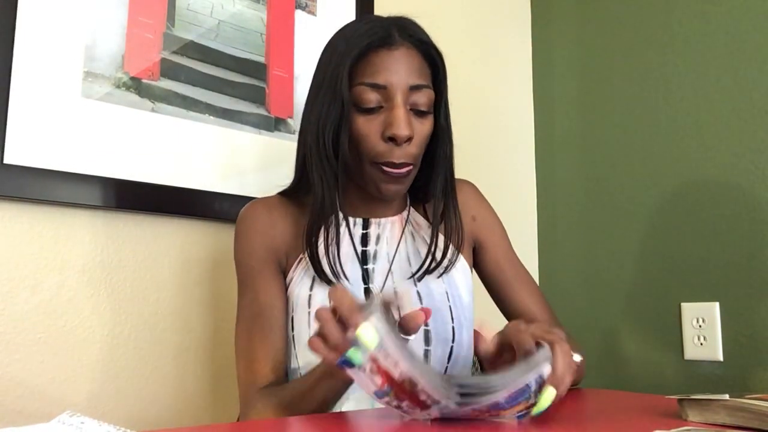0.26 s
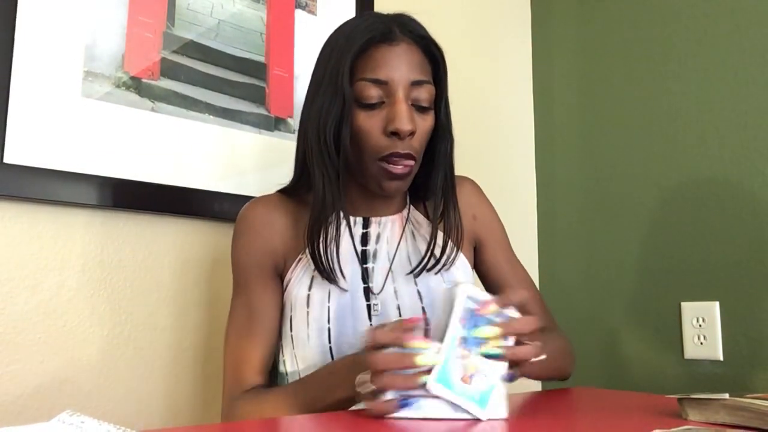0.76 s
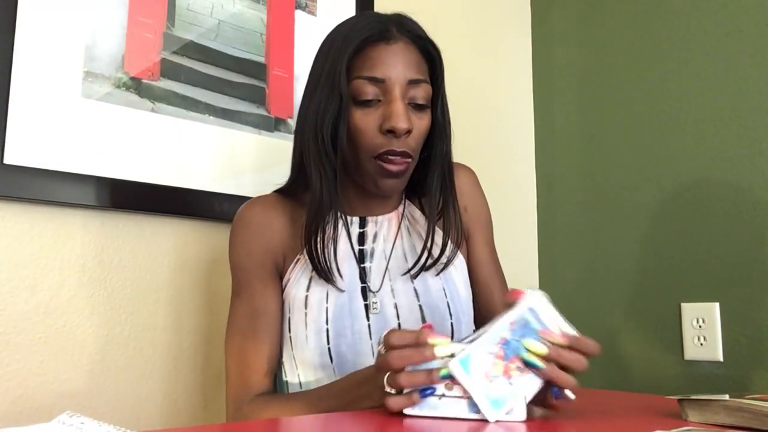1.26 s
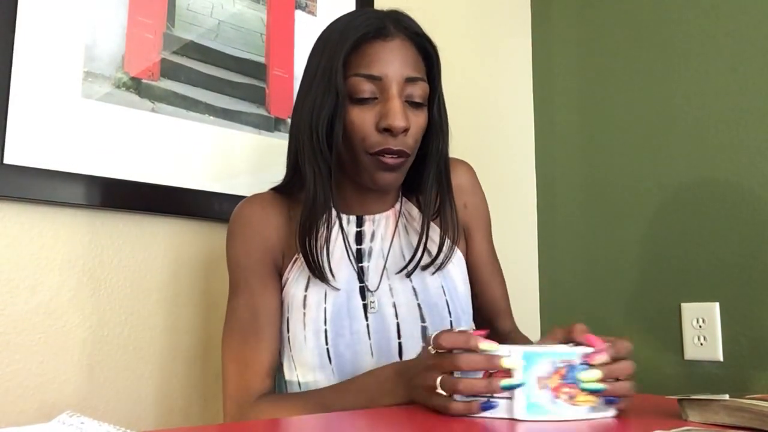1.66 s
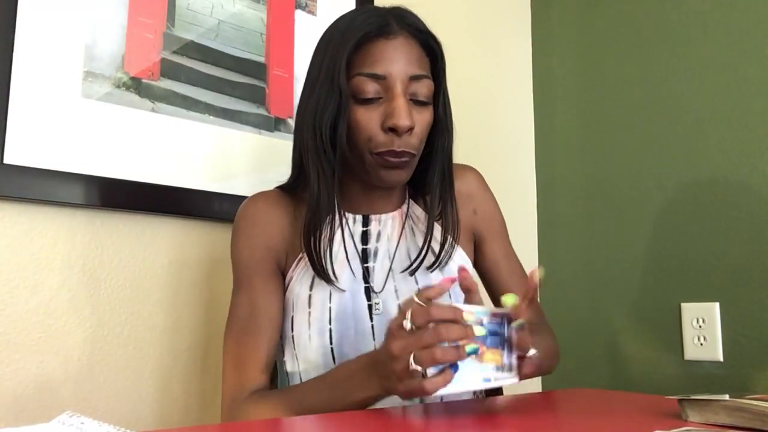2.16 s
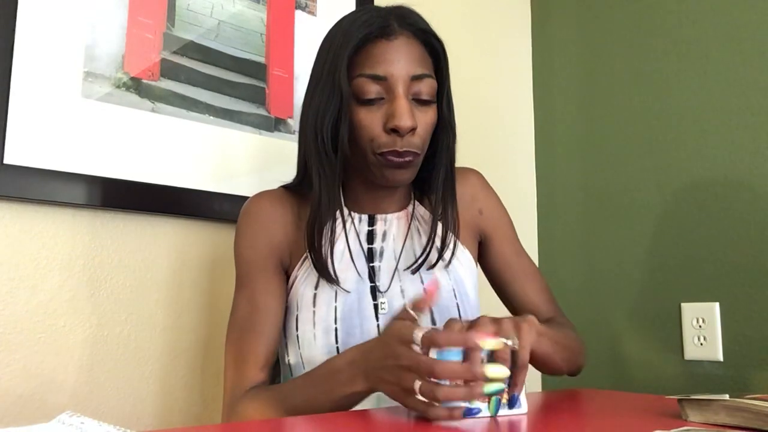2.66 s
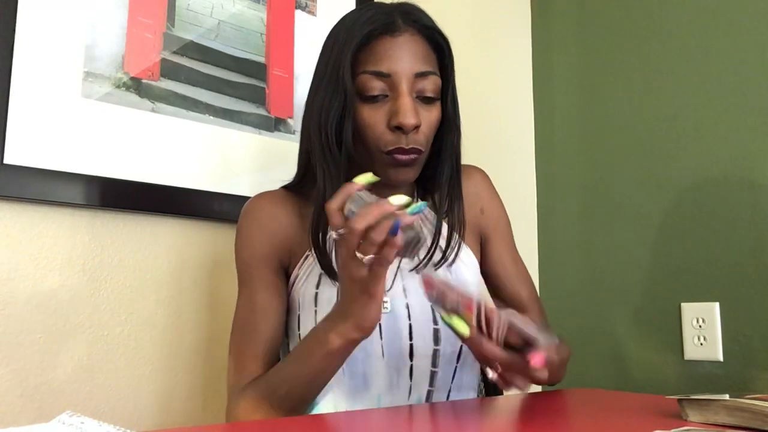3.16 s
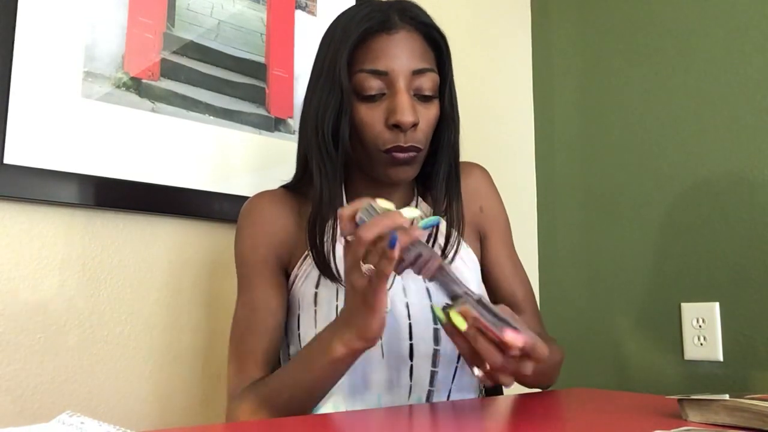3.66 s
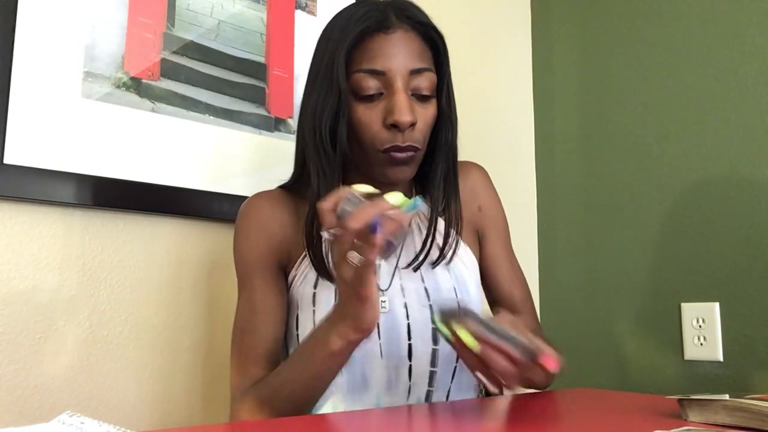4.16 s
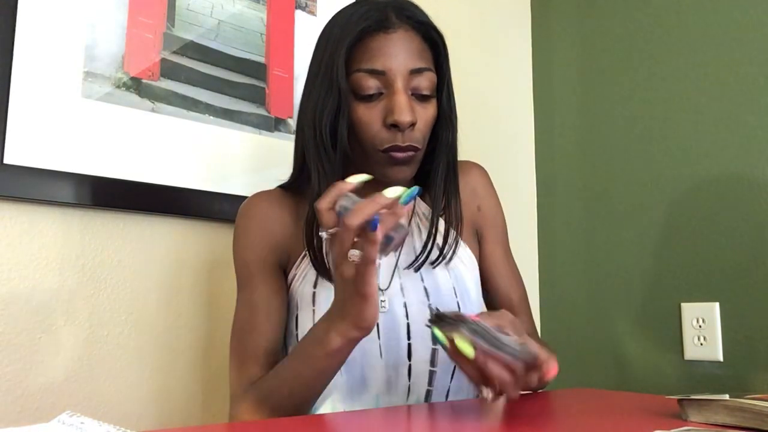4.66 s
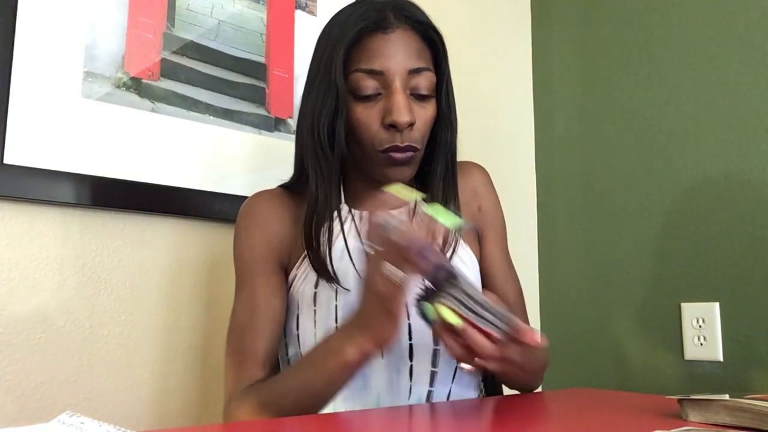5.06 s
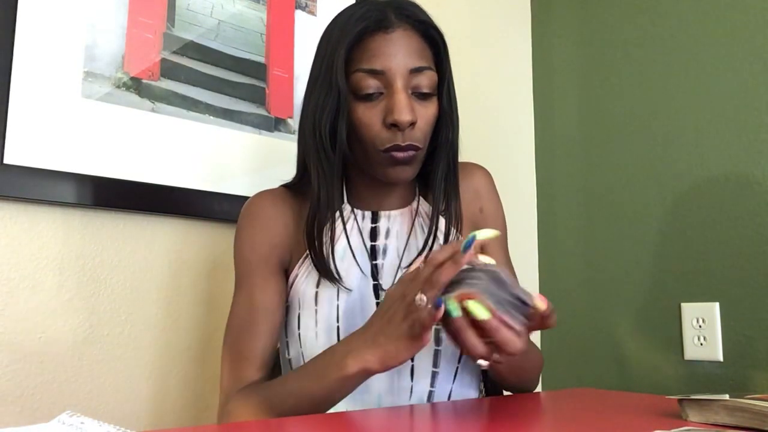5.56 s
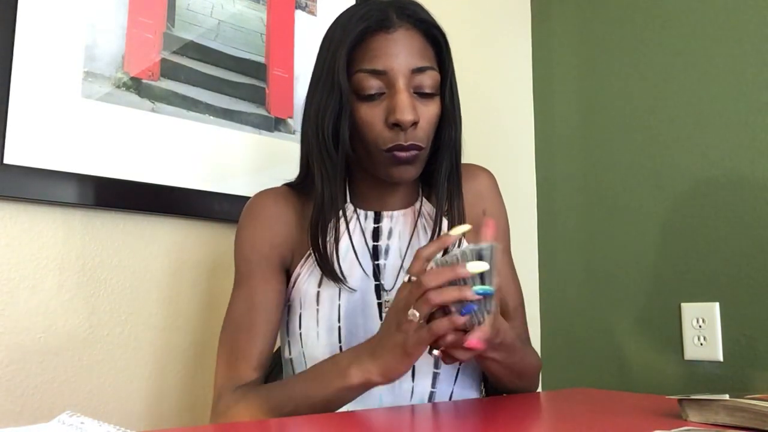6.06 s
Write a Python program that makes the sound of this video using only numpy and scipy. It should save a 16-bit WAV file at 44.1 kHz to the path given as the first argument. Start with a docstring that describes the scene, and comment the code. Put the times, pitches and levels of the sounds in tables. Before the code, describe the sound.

Quick crackling card riffle, light table thuds and taps, one crisp double slap, then faint papery overhand shuffling above a low ventilation hum.

```python
"""A deck of cards is riffled on a table, squared with knocks and taps, then shuffled overhand in a quiet room.
Each card edge is a short burst of noise around its own pitch, topped by a bright crack.
Pushes from the deck set the modes of the table top ringing, and packets slide over each other as grainy noise.
The room adds a tail of dying noise; below it all ventilation hums as steady coloured noise."""
import sys
import numpy as np
from scipy import signal
from scipy.fft import rfft, irfft, next_fast_len
from scipy.io import wavfile

SR = 44100
rng = np.random.default_rng(int(sys.argv[2]) if len(sys.argv) > 2 else 0)


def store_pcm(level_fs):
    """Save levels as 16-bit WAV."""
    pcm = np.round(np.clip(level_fs, -1, 1) * 32767).astype(np.int16)
    wavfile.write(sys.argv[1], SR, np.atleast_2d(pcm).T)


def invert_db(x):
    """Field ratio 10**(x/20) for x, a level in decibels (scalar or array-like)."""
    u = np.asarray(x, float) / 20
    return 10 ** u


N = 277830   # length in samples

# card corners that snap loudest in the riffle: t/s, slap peak level/dB, slap f/Hz, crack peak level/dB
LOUD_CORNERS = [(0.164, -21.5, 1200, -21), (0.1945, -15, 1310, -13.5), (0.2051, -16, 1460, -21),
                (0.2163, -9, 2200, -12.5), (0.2275, -11, 3880, -14), (0.2437, -8.5, 1100, -24),
                (0.254, -11, 1040, -28), (0.2703, -5.5, 1880, -12.5), (0.2874, -7.5, 1370, -25),
                (0.3226, -10.5, 2560, -18), (0.3292, -6.5, 2200, -27), (0.3383, -3.5, 2390, -14),
                (0.3473, -8.5, 1880, -9.5)]
# short ticks of edges and nails: t/s, slap peak level/dB, slap f/Hz, crack peak level/dB
EDGE_TICKS = [(0.0676, -40, 720, -48), (0.6461, -40.5, 1250, -34.5), (0.7128, -38, 758, -41.5),
              (0.8563, -35.5, 3750, -66), (0.8705, -28.5, 3940, -30.5), (0.9531, -41, 2860, -45.5),
              (0.9658, -36, 3086, -44.5), (1.0784, -36, 3220, -46), (1.106, -46, 1450, -53),
              (1.1628, -40.5, 3660, -50), (1.195, -38, 2650, -48), (1.312, -38.5, 1710, -36.5),
              (1.4731, -45, 3720, -68), (1.6977, -38, 2640, -37), (1.7516, -21.5, 3320, -38),
              (1.7583, -24, 3300, -32.5), (1.854, -41, 3900, -46), (2.0557, -42.5, 1670, -53),
              (2.0904, -35, 2740, -45), (2.133, -36, 1230, -42.5), (2.3059, -50.5, 2000, -58.5),
              (2.4501, -54, 1300, -35), (2.6256, -29.5, 2380, -30), (2.7604, -32.5, 1500, -42),
              (3.213, -31, 2610, -44), (3.242, -47, 1408, -50), (3.3979, -45, 1760, -56),
              (3.4548, -42, 2840, -58), (3.5056, -43, 750, -48.5), (3.661, -47.5, 760, -41.5),
              (3.602, -56, 2970, -54), (3.7, -49, 1400, -60), (3.7261, -42.5, 1390, -54),
              (4.0001, -39.5, 739, -42), (4.3972, -38.5, 1174, -51), (4.4713, -44, 2590, -43),
              (4.5152, -43, 740, -42), (5.4538, -37, 1870, -41), (5.4571, -31.5, 756, -40),
              (5.464, -31, 4110, -54), (5.629, -52.5, 887, -48.5)]
# packets landing, mostly dull and longer than the ticks, plus one faint high rattle near 5.47 s:
# t/s, slap peak level/dB, slap f/Hz, contact t60/s (used up to 0.2)
PACKET_SLAPS = [(0.697, -26.5, 1040, 0.069), (0.8335, -30.5, 1273, 0.041), (1.3621, -33, 750, 0.035),
                (2.1204, -32, 1160, 0.037), (2.1862, -30.5, 1190, 0.044), (2.3726, -19, 1900, 0.036),
                (2.3832, -8, 1350, 0.032), (2.3906, -5.5, 1810, .041), (2.3973, -17, 1350, 0.023),
                (2.5273, -26, 1680, 0.049), (2.5489, -21, 1820, .01), (2.5562, -15.5, 1820, 0.025),
                (2.6415, -40, 1385, 0.01), (4.2548, -32, 770, 0.027), (4.658, -28, 1855, 0.01),
                (4.7314, -37, 755, 0.018), (3.222, -36.5, 1500, 0.038), (5.231, -36.5, 786, 0.047),
                (5.2388, -36, 776, 0.026), (5.467, -44, 4800, 0.23)]
# the deck pushing on the table top: t/s, push level/dB
DECK_PUSHES = [(0.689, -23.5), (0.714, -29), (0.858, -37), (0.904, -41.5), (1.253, -47.5), (1.362, -30.5),
               (1.737, -40.5), (1.801, -41.5), (2.093, -41.5), (2.123, -36.5), (2.187, -41.5),
               (2.376, -32.5), (2.3885, -23), (2.533, -33), (2.558, -26.5), (2.761, -37)]
# ringing modes of the table top: f/Hz, level/dB relative to the push, t60/s
TABLE_MODES = [(114, -10, 0.095), (161.2, -3.5, 0.13), (269.6, -0.5, 0.042), (367, -9, 0.054),
               (634.7, -14, 0.08)]
# strokes of cards over cards: start t/s, length t/s, rub level/dB, treble hiss level/dB
CARD_STROKES = [(0.064, 0.013, -63, -79), (0.129, 0.011, -57.5, -90), (0.187, .19, -30.5, -40),
                (0.645, 0.046, -62.5, -64), (0.673, 0.096, -63, -79), (0.825, 0.11, -58.5, -74.5),
                (1.094, 0.023, -72, -93), (1.18, 0.15, -67.5, -83), (1.275, 0.087, -63, -71),
                (1.457, 0.18, -68, -79), (1.66, 0.056, -59, -74), (1.741, 0.054, -55, -62),
                (1.881, 0.097, -65.5, -65.5), (2.075, 0.11, -55, -71), (2.288, 0.017, -75, -99),
                (2.375, 0.047, -38.5, -59), (2.536, .1, -52.5, -94), (2.752, 0.052, -59, -73.5),
                (3.021, 0.17, -71.5, -78.5), (3.196, 0.027, -48.5, -62), (3.358, .05, -62.5, -74.5),
                (3.422, 0.11, -58, -71), (3.621, 0.036, -58.5, -82), (3.649, 0.082, -55, -65.5),
                (3.866, 0.056, -64, -71), (3.979, 0.02, -53, -67), (4.186, 0.094, -55, -72),
                (4.398, 0.015, -52.5, -77), (4.455, 0.079, -56, -69), (4.648, 0.082, -52, -63),
                (4.89, 0.041, -66, -73), (4.929, 0.062, -54, -72), (5.123, 0.077, -58, -66.5),
                (5.219, 0.02, -54, -77), (5.368, 0.06, -58.5, -65.5), (5.446, 0.034, -56.5, -69),
                (5.625, 0.033, -55.5, -64.5), (5.802, 0.066, -70.5, -72.5), (6.082, 0.09, -76, -77.5)]
# colour of the rub while the deck is still on the table: f/Hz, relative level/dB per Hz
TABLE_RUB_COLOUR = [(200, -10.5), (700, -3), (2000, -5), (3600, -6), (4800, -16), (9000, -33.5)]
# colour of the rub with the deck in the hands: f/Hz, relative level/dB per Hz
HAND_RUB_COLOUR = [(200, 0.5), (450, -2), (1300, -8), (2100, -8), (2900, -7.5), (3600, -16.5),
                   (6000, -26.5), (9000, -29)]
# colour of the treble hiss of sliding paper: f/Hz, relative level/dB per Hz
PAPER_HISS_COLOUR = [(2350, -34.5), (4000, -3), (4930, -6), (10000, -7.5), (13700, -10), (16000, -16.5)]
# how the room dies away: f/Hz, t60/s, level/dB of the noise before it is cut to its octave
ROOM_DECAY = [(150, .3, -30.5), (463, 0.77, -13.5), (1500, 0.13, -15), (4300, 0.69, -17),
              (10000, 0.042, -10.5)]
# colour of the ventilation: f/Hz, relative level/dB per Hz
AIR_COLOUR = [(30, -29.5), (56, 7.5), (75, -9.5), (110, 3), (150, -2.5), (190, -1), (320, -11), (480, -24),
              (820, -29), (1800, -29.5), (3000, -31.5), (7300, -35.5), (14800, -37.5), (16000, -45.5)]

LIFTED_S = 2.7   # the deck leaves the table
FLICK_T60_S, TICK_T60_S = 0.012, 0.01
SLAP_CRACK_DB = -30.5   # crack of a packet slap, relative to its peak
# the softer corners of the riffle
BURR_FROM_S, BURR_EVERY_S, BURR_COUNT = 0.172, 0.0135, 15
BURR_DB, BURR_SPREAD_DB, BURR_CRACK_DB = -22.5, 1.5, -24.5
BURR_HZ, BURR_OCTAVES = 2200, 0.41   # middle pitch and its spread
# each loud corner also pushes the table: base level, and dB added per dB of the corner's peak level
RIFFLE_PUSH_DB, RIFFLE_PUSH_FOLLOWS = -25, 0.35
STROKE_RISE_DB_PER_S, STROKE_SAG_DB_PER_S, STROKE_FADE_DB_PER_S = 1501, 33, 262.5
HANDLING_DB, HANDLING_HISS_DB = -74.5, -86   # faint rub between strokes while the deck is on the table
AIR_DB = -60


def snaps(events, rough, below, above, crack_t60):
    """A card edge lets go or lands: a rough, dull slap around the card's pitch with a bright crack on top."""
    out = np.zeros(N + SR)
    t = np.arange(SR // 5) / SR
    noise = rng.standard_normal((len(events), 2, len(t)))
    bright = signal.butter(1, [3500, 11000], "band", fs=SR, output="sos")
    for (s, peak_db, hz, crack_db, t60), (chatter, crack) in zip(events, noise):
        t60 = np.clip(t60, 0.002, 0.2)
        swell = np.minimum(t / t60 * 30, 1)   # a long contact builds up more slowly
        blow = swell * invert_db(-60 * t / t60) * chatter * rough
        blow[round(t60 / 30 * SR)] += 1   # one clean click where the swell is complete
        around_pitch = signal.butter(3, [hz / below, hz * above + 500], "band", fs=SR, output="sos")
        slap = signal.sosfilt(around_pitch, blow)
        crack = signal.sosfilt(bright, crack * invert_db(-60 * t / crack_t60))
        slap = invert_db(peak_db) * slap / np.abs(slap).max()
        crack = invert_db(crack_db) * crack / np.abs(crack).max()
        at = round(s * SR)
        out[at:at + len(t)] += slap + crack
    return out[:N]


def burr():
    """The softer corners slip off at an uneven pace, with scattered strength and pitch."""
    late, strength, pitch = rng.standard_normal((BURR_COUNT, 3)).T
    s = BURR_FROM_S + BURR_EVERY_S * (np.arange(BURR_COUNT) + late / 4)
    louder_db = BURR_SPREAD_DB * strength
    hz = BURR_HZ * 2 ** (BURR_OCTAVES * np.clip(pitch, -2, 2))
    return list(zip(s, BURR_DB + louder_db, hz, BURR_CRACK_DB + louder_db))


def riffle():
    """Loud and soft card corners snap one by one, each dying within milliseconds."""
    flicks = [(*flick, FLICK_T60_S) for flick in LOUD_CORNERS + burr()]
    return snaps(flicks, rough=0.15, below=2.19, above=1.44, crack_t60=0.0035)


def taps():
    """Edges and nails tick briefly; packets land, mostly with a longer contact; one high rattle is faint."""
    ticks = [(*tick, TICK_T60_S) for tick in EDGE_TICKS]
    slaps = [(s, db, hz, db + SLAP_CRACK_DB, t60) for s, db, hz, t60 in PACKET_SLAPS]
    return snaps(ticks + slaps, rough=0.52, below=1.734, above=1.128, crack_t60=0.0084)


def ring(clicks, hz, t60):
    """A unit click sets a sine ringing from about height 1, like a struck mode."""
    r, w = invert_db(-60 / (t60 * SR)), 2 * np.pi * hz / SR
    return signal.lfilter([0, np.sin(w)], [1, -2 * r * np.cos(w), r * r], clicks + 1e-18)


def table(push_hz, spread_db):
    """Soft pushes drive every mode of the table top with a strength of their own."""
    riffle_pushes = [(s, RIFFLE_PUSH_DB + RIFFLE_PUSH_FOLLOWS * db) for s, db, *_ in LOUD_CORNERS]
    thuds = DECK_PUSHES + riffle_pushes
    at = [round(s * SR) for s, db in thuds]
    push_db = np.array(thuds)[:, 1]
    chance = rng.standard_normal((len(thuds), len(TABLE_MODES)))
    out = np.zeros(N)
    for k, (hz, level_db, t60) in enumerate(TABLE_MODES):
        pushes = np.zeros(N)
        pushes[at] = invert_db(push_db + level_db + spread_db * chance[:, k])
        out += ring(pushes, hz, t60)
    # a soft push holds little treble
    return signal.sosfilt(signal.butter(3, [85, push_hz], "band", fs=SR, output="sos"), out)


def rms_one(x):
    """Scale a signal to unit power."""
    return x / np.sqrt(np.mean(x ** 2) + 1e-20)


def at_hz(points, hz, column=1):
    """Read a table between its points, along a log-frequency axis."""
    points = np.array(points)
    return np.interp(np.log(hz), np.log(points[:, 0]), points[:, column])


def shaped(x, spectrum):
    """Colour a noisy signal by a spectrum and scale it to unit power."""
    size = next_fast_len(len(x))
    hz = np.maximum(np.arange(size // 2 + 1) * SR / size, 1)
    coloured = irfft(rfft(x, size) * invert_db(at_hz(spectrum, hz)), size)
    return rms_one(coloured[:len(x)])


def drift(rate):
    """Slow random wandering with spread 1; rate in Hz sets how fast it goes."""
    r = np.exp(-2 * np.pi * rate / SR)
    noise = rng.standard_normal(N + SR)
    return rms_one(signal.lfilter([1], [1, -2 * r, r * r], noise)[SR:])


def stroke_gains():
    """Each stroke starts quickly, sags while it lasts and fades as the cards come to rest; powers add."""
    t = np.arange(0, N, 32) / SR   # a coarse time grid is enough
    start, length, rub_db, hiss_db = np.array(CARD_STROKES).T[:, :, None]
    since = t - start
    rise_db = np.minimum(STROKE_RISE_DB_PER_S * since - 16.5, 0)
    sag_db = STROKE_SAG_DB_PER_S * np.clip(since, 0, length)
    fade_db = STROKE_FADE_DB_PER_S * np.maximum(since - length, 0)
    shape_db = rise_db - sag_db - fade_db
    gains = []
    for db, rest_db in ((rub_db, HANDLING_DB), (hiss_db, HANDLING_HISS_DB)):
        stroke_power = np.sum(invert_db(db + shape_db) ** 2, axis=0)
        handling_power = invert_db(rest_db) ** 2 * (t < LIFTED_S)
        gains.append(np.interp(np.arange(N) / SR, t, np.sqrt(stroke_power + handling_power)))
    return gains


def slides(grains_per_s, grain_db, grain_share, flutter_db):
    """Paper on paper: smooth friction noise with grains where the coating catches, uneven along the stroke."""
    rub_gain, hiss_gain = stroke_gains()
    t = np.arange(N) / SR
    catches = rng.random(N) < grains_per_s / SR
    strength = invert_db(grain_db * np.minimum(rng.exponential(1, N), 3))
    grains = rms_one(catches * strength * rng.choice([-1, 1], N))
    smooth = rng.standard_normal(N)
    friction = smooth + grain_share * grains
    paper = smooth + grain_share / 2 * grains   # catches are dull, so they are weaker in the hiss
    on_table, in_hands = shaped(friction, TABLE_RUB_COLOUR), shaped(friction, HAND_RUB_COLOUR)
    colour = np.where(t < LIFTED_S, on_table, in_hands)
    rub = rub_gain * invert_db(flutter_db * drift(40)) * colour
    hiss = hiss_gain * invert_db(flutter_db * drift(40)) * shaped(paper, PAPER_HISS_COLOUR)
    return rub + hiss


def room(x, first_wall_s):
    """Diffuse tail: octave bands of noise, each dying at its own rate after a short build-up."""
    t = np.arange(int(0.7 * SR)) / SR
    build_up = np.minimum(t / first_wall_s, 1)
    tail = 0
    for hz in 90 * 2.0 ** np.arange(8):
        band = signal.butter(2, [hz / np.sqrt(2), hz * np.sqrt(2)], "band", fs=SR, output="sos")
        dying = rng.standard_normal(len(t)) * invert_db(-60 * t / at_hz(ROOM_DECAY, hz)) * build_up
        dying = dying / np.sqrt(np.sum(dying ** 2))
        tail = tail + invert_db(at_hz(ROOM_DECAY, hz, column=2)) * signal.sosfilt(band, dying)
    return signal.fftconvolve(x, tail)[:N]


def ventilation(waver_db):
    """Steady low hum of moving air over faint hiss, wavering slightly in level."""
    return invert_db(AIR_DB + waver_db * drift(3.3)) * shaped(rng.standard_normal(N), AIR_COLOUR)


def scene():
    """Everything near the table shares one room; the ventilation is added without it."""
    thuds = table(push_hz=710, spread_db=1.5)
    rubbing = slides(400, grain_db=3.3, grain_share=0.8, flutter_db=3.0)
    near = riffle() + taps() + thuds + rubbing
    mix = near + room(near, first_wall_s=0.002) + ventilation(waver_db=-0.56)
    return mix[None]   # one channel


def top_cut(x):
    """Nothing passes above the cut-off."""
    return signal.sosfilt(signal.butter(12, 16660, fs=SR, output="sos"), x)


def record(dry):
    """A small microphone drops the deep bass, and a steep filter cuts the top."""
    thin = signal.sosfilt(signal.butter(4, 48, "high", fs=SR, output="sos"), dry)
    cut = signal.sosfilt(signal.cheby2(12, 45, 16500, fs=SR, output="sos"), thin)
    return top_cut(cut)


dry = scene()
out = record(dry)
store_pcm(out)
```